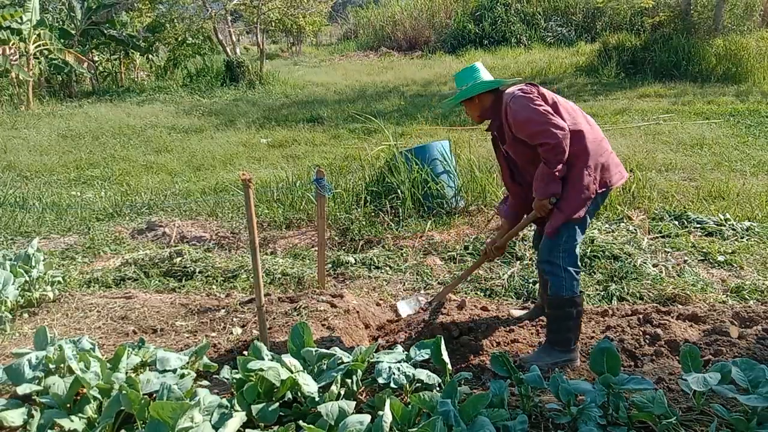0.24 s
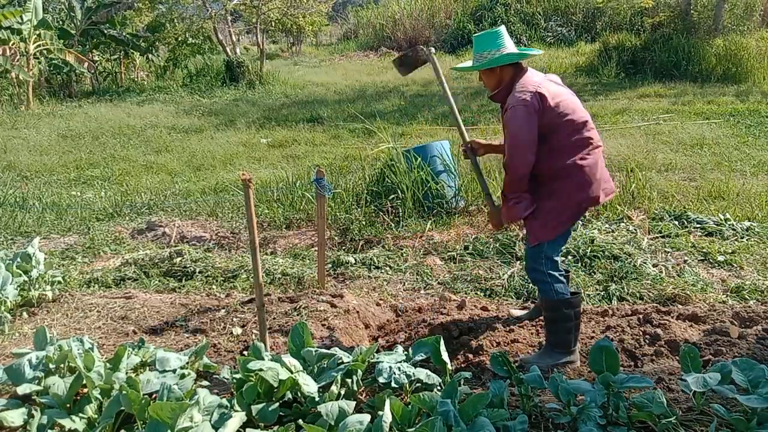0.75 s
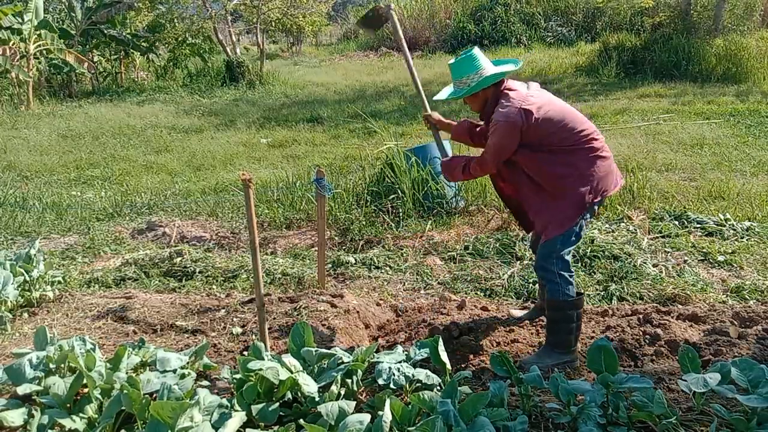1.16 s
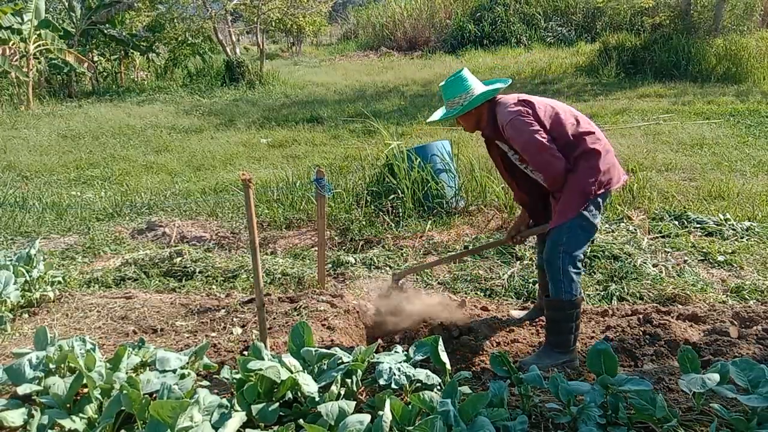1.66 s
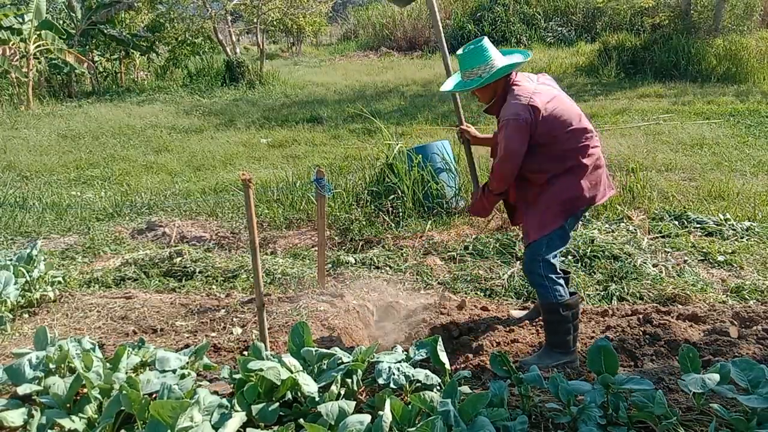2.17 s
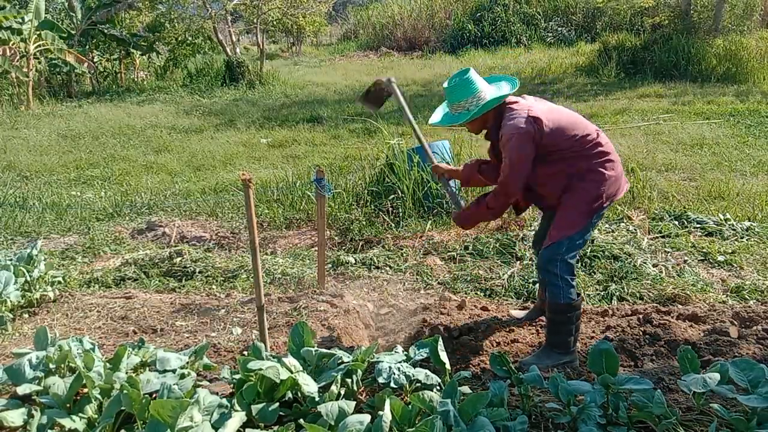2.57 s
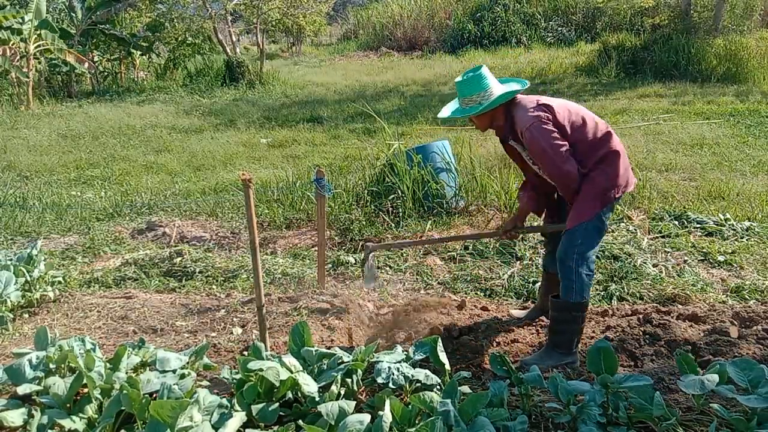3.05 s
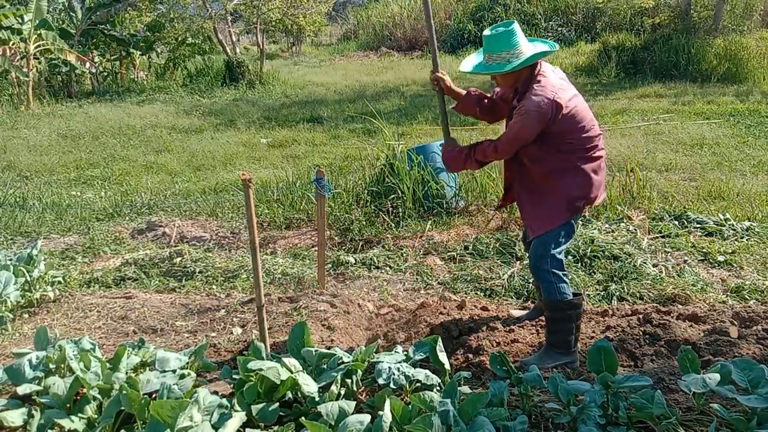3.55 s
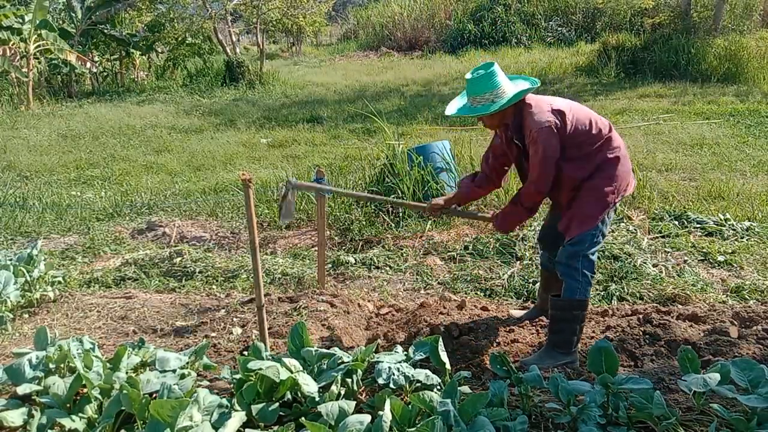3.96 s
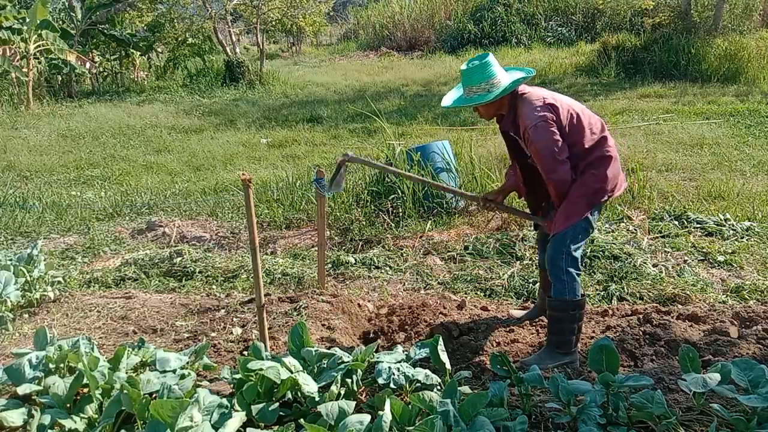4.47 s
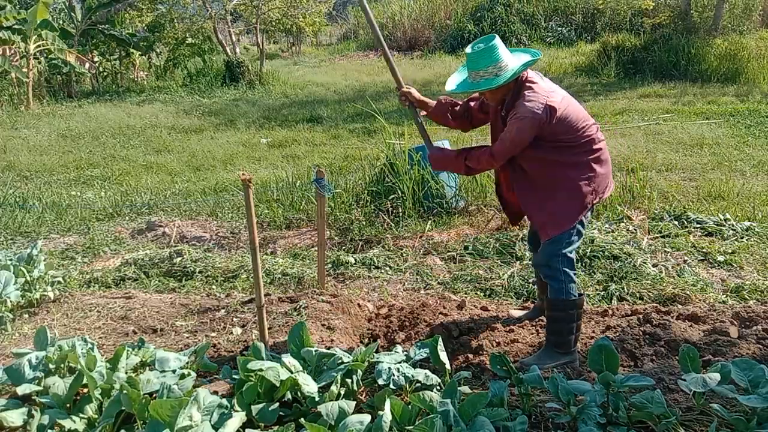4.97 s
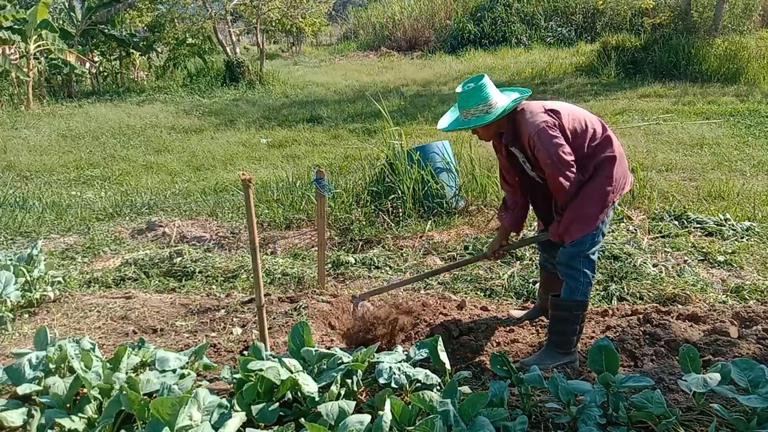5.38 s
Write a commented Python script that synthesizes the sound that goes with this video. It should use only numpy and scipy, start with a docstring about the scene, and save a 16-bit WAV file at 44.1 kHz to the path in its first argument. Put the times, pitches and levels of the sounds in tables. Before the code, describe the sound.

Four gritty hoe thuds in dry earth, one with a steel clink, over low wind rumble and a faint high tone.

```python
"""In a garden, a few metres away, a hoe chops four times into dry soil; the second blow strikes a stone
and the steel blade clinks. Each blow is a quick run of gritty cracks and a dull thud, followed by
falling crumbs and a short outdoor echo. Wind buffets the microphone over a pulsing hiss, a soft
rustle, an airy high tone and a faint, far motor."""
import sys
import numpy as np
from scipy import signal
from scipy.fft import rfft, irfft, next_fast_len
from scipy.io import wavfile
from scipy.ndimage import map_coordinates

SR = 44100
rng = np.random.default_rng(int(sys.argv[2]) if len(sys.argv) > 2 else 0)


def dump(signal):
    """Clip the signal to [-1, 1] and save it as 16-bit WAV at the path in sys.argv[1]."""
    limited = np.clip(np.atleast_2d(signal).T, -1, 1)
    pcm = np.round(limited * 32767).astype(np.int16)
    wavfile.write(sys.argv[1], SR, pcm)


N = 247842
TIME = np.arange(N) / SR

# How strong each sound is from bass to treble: pitch_hz, relative_db
AIR_SPECTRUM = [(30, 10.5), (90, 18), (250, -6.5), (520, -3.5), (850, -0.5), (1700, -2), (3500, -4),
                (5700, -8.5), (7400, -14), (8100, -18.5), (11000, -15.5), (13800, -25.5), (14900, -14),
                (16000, -9.5)]
TONE_SPECTRUM = [(450, -41.5), (620, -16), (850, -16.5), (990, -16), (1130, -7), (1260, 5.5), (1350, -11),
                 (1480, -29.5), (1650, -16.5), (2000, -28.5), (4000, -52.5)]
HISS_SPECTRUM = [(100, -19.5), (600, -32.5), (1000, -25), (1450, 11), (2000, -1), (2600, 3), (3050, -6),
                 (3800, 1.5), (4700, 3), (5700, -2), (6300, -21), (7100, -5.5), (8300, -24.5),
                 (13800, -20.5), (14900, -3.5), (16000, -4.5)]
CHIRR_SPECTRUM = [(3500, -26), (4500, -6), (5400, 3.5), (5900, -5.5), (6400, -18.5), (7300, -4),
                  (8200, -22)]  # the thin, insect-like top of the hiss
WIND_SPECTRUM = [(25, -29.5), (45, -15.5), (70, 3.5), (100, 3.5), (150, -3), (230, -16.5), (330, -22),
                 (500, -33), (900, -76.5)]
ECHO_SPECTRUM = [(100, -4.5), (700, -3), (2500, -8), (6000, -2), (8500, 1.5), (15000, -11)]
SOIL_SPECTRUM = [(100, -14), (400, -17.5), (800, -5), (1300, -4), (2100, 3), (3700, 2.5), (5800, -3),
                 (7500, -4.5), (8200, -13), (9800, -6), (13600, -16.5), (14800, -6), (16000, -20)]

# How each sound slowly grows and fades: time_s, level_db
AIR_LEVEL = [(0, -54), (2, -61), (5.62, -60)]
TONE_LEVEL = [(0, -55), (.4, -52.5), (.8, -67.5), (1.4, -58.5), (2.0, -52.5), (2.7, -52.5), (3.85, -55.5),
              (3.98, -66.5), (4.5, -66.5), (5.62, -67)]
MOTOR_SWELL = [(0, -5.5), (.45, -2), (.8, 1.5), (1.2, -2.5), (1.7, -11), (5.62, -85)]  # added to the level of every motor tone
HISS_LEVEL = [(0, -51.5), (.45, -48), (.82, -58), (1.3, -58.5), (1.7, -72.5), (5.62, -82.5)]
WIND_LEVEL = [(0, -46), (.33, -43), (.66, -54), (1.1, -53.5), (1.2, -42), (1.65, -44), (2.12, -62),
              (2.52, -47), (2.74, -60.5), (2.83, -42), (3.0, -73), (3.22, -38.5), (3.5, -42), (3.82, -41.5),
              (4.04, -71.5), (4.15, -45), (4.45, -56.5), (4.58, -75), (4.72, -51.5), (5.05, -43.5),
              (5.28, -56), (5.55, -47.5)]

# Brief dips in the background: time_s, depth_db, half_length_s
LULLS = [(0.184, 5.5, 0.0091), (0.365, 4, 0.0078), (0.856, 4, 0.018), (1.022, 2, 0.009), (2.068, 9, 0.013),
         (2.401, 12.5, 0.01), (3.625, 4, 0.018), (4.502, 6.5, 0.02), (5.291, 6, .018)]
# The hum of the far motor: pitch_hz, level_db
MOTOR_TONES = [(366, -70), (402, -67.5), (437, -74)]
# The sinking rustle: time_s, centre_hz, level_db
RUSTLE_PATH = [(0, 3200, -104), (1.85, 2500, -67), (2.7, 2110, -66.5), (3.3, 2001, -75),
               (5.62, 1960, -75.5)]
# Strong eddies (whirls of air) thump the microphone: time_s, level_db, pitch_hz
BUFFETS = [(0.169, -24.5, 166), (0.34, -33, 131), (.562, -31.5, 99), (.853, -33, 109), (0.946, -36, 120),
           (1.161, -21.5, 148), (1.223, -26.5, 159), (1.358, -26.5, 133), (1.394, -27.5, 131),
           (1.46, -29, 147), (1.631, -27, 180), (1.738, -22.5, 150), (2.034, -27.5, 132),
           (2.209, -35.5, 107), (2.312, -33, 114), (2.629, -30, 96), (3.211, -21, 135), (3.32, -21, 285),
           (3.356, -21, 113), (3.376, -24.5, 266), (3.428, -20.5, 190), (3.46, -18, 156),
           (3.477, -16.5, 179), (3.509, -20.5, 160), (3.66, -21, 127.8), (4.198, -31.5, 141.4),
           (4.43, -30, 113), (4.808, -33.5, 119), (5.014, -32.5, 121), (5.541, -33.5, 116)]
# Stray lumps of soil roll down: start_s, level_db, length_s, tilt_db_per_octave
LUMPS = [(1.409, -55.5, .023, -4), (1.571, -49, 0.023, -11), (1.732, -57.5, 0.024, -7),
         (1.782, -54.5, 0.084, -10), (1.908, -57, 0.042, -2.5), (2.099, -60, 0.16, -7.5),
         (2.631, -55, 0.061, -9.5), (2.757, -52, 0.0077, -8), (3.672, -53.5, 0.067, -12.5)]
# After each blow crumbs settle, trickle on, and slide as the blade is pulled out:
# delay_s, level_db, length_s, tilt_db_per_octave
CRUMB_FALLS = [(0.039, -55, .038, -8), (.085, -61.5, .11, -2.5), (0.278, -59, 0.068, -7)]
# The tones of the steel blade: pitch_hz, relative_db, ring_s (time to fade by 60 dB)
BLADE_TONES = [(1029, -12, .016), (1253, -7, .029), (1868, -13, .04), (2630, -9, .033), (3260, -11, .014),
               (3520, -10, .03), (3815, -1, .026), (4810, -8, .022), (4990, -10, .02), (5753, -12, .032),
               (5980, -16, .04), (6540, -13, .032), (10320, -17, .02), (11360, -23, .019),
               (14630, -21, .06)]
# A clod gives way in three cracks:
# share_of_sink_time, relative_db, length_s, tilt_db_per_octave, pitch_ratio
CLOD_CRACKS = [(0.632, 1, 0.0013, -1, 0.9), (0.864, -5, .006, -1, .75), (0.978, -0.5, .003, -2.5, 1.15)]
# Blows of the hoe: start_s, graze_db, bite_db, bite_length_s, tilt_db_per_octave, bite_hz, ring_db,
# sink_time_s, clod_db, clod_hz, thud_db, thud_hz, spill_db
BLOWS = [(1.483, -36.5, -27, 0.0052, -2.5, 1320, -60, .012, -34.5, 1370, -35.5, 304, -49.5),
         (2.8077, -70, -17, .004, 2, 3700, -5, .021, -34, 1610, -33, 404, -37),
         (4.1156, -34, -20, .0016, 7.5, 5460, -37.5, .024, -26.5, 3100, -33.5, 270, -50.5),
         (5.352, -64, -20, 0.0025, 8, 5700, -33, .0225, -24.5, 3000, -37.5, 400, -42.5)]


def gain(db):
    """Turn decibels into a number to multiply by."""
    return 10 ** (np.asarray(db) / 20)


def unit(x):
    """Scale a signal to an average power of 1."""
    return x / np.sqrt(np.mean(x ** 2))


def curve(rows):
    """Join a table's points with straight lines in time, one curve for each value column."""
    times, *columns = np.transpose(rows)
    return [np.interp(TIME, times, column) for column in columns]


def colour(x, spectrum, tilt_db=0):
    """Filter a sound to a spectrum; a tilt above 0 (dB per octave) brightens it, below 0 dulls it."""
    size = next_fast_len(len(x) + 2048, real=True) * 2
    octave = np.log2(np.maximum(np.arange(size // 2 + 1) * SR / size, 1))
    hz, db = np.transpose(spectrum)
    slope_db = tilt_db * np.clip(octave, np.log2(900), np.log2(9000))
    shape = unit(gain(np.interp(octave, np.log2(hz), db) + slope_db))
    # these steps make the filter ring only after a click, never before it
    cepstrum = irfft(np.log(shape))
    cepstrum[1:size // 2] *= 2
    cepstrum[size // 2 + 1:] = 0
    return irfft(rfft(x, size) * np.exp(rfft(cepstrum)))[:len(x)]


def noise(spectrum):
    """Steady noise with the given spectrum."""
    return unit(colour(rng.standard_normal(N), spectrum))


def wander(rate_hz):
    """A random drift around 0, about 1 in size."""
    steps = rng.standard_normal(N)
    return np.sqrt(3 / 2) * np.interp(TIME * rate_hz, np.arange(N), steps)


def flutter(depth_db, rate_hz):
    """A gain that wavers at random."""
    return unit(gain(depth_db * wander(rate_hz)))


def swirl(x, spread_db, patch_hz=260, patch_s=.11):
    """Make small patches of neighbouring pitches swell and fade, each in its own time."""
    hz, s, spectrum = signal.stft(x, SR, nperseg=512)
    patches = np.meshgrid(hz / patch_hz, s / patch_s, indexing="ij")
    swells = map_coordinates(rng.standard_normal((256, 512)), patches, order=3, mode="nearest")
    return signal.istft(spectrum * unit(gain(spread_db * swells)), SR)[1][:N]


def add(track, start_s, sound):
    """Mix a sound into a track."""
    start = int(start_s * SR)
    track[start:start + len(sound)] += sound[:N - start]


def burst(t, length_s, rise_s):
    """A loudness shape that rises fast, holds briefly and dies."""
    return (1 - np.exp(-t / rise_s)) * np.exp(-(t / (1.19 * length_s)) ** 2)


def lulls():
    """A gain that dips briefly at each lull."""
    return gain(-sum(db * np.exp(-.5 * ((TIME - s) / half_s) ** 2) for s, db, half_s in LULLS))


def still_air():
    """The soft, even hush of the outdoors."""
    level_db, = curve(AIR_LEVEL)
    return swirl(noise(AIR_SPECTRUM), spread_db=2.8, patch_hz=280, patch_s=.035) * gain(level_db)


def airy_tone():
    """Noise gathered around one high pitch makes a breathy, wavering tone."""
    level_db, = curve(TONE_LEVEL)
    tone = swirl(noise(TONE_SPECTRUM), spread_db=4.2, patch_hz=120, patch_s=.035)
    return tone * flutter(depth_db=2, rate_hz=14) * gain(level_db)


def motor(drift=.008, waver_db=3, waver_hz=14):
    """A far engine hums with a few wavering tones, then fades away."""
    swell_db, = curve(MOTOR_SWELL)
    clock = np.cumsum(1 + drift * wander(waver_hz)) / SR
    hum = np.zeros(N)
    for hz, db in MOTOR_TONES:
        level = gain(db + swell_db + waver_db * wander(waver_hz))
        hum += np.sqrt(2) * level * np.sin(2 * np.pi * hz * clock)
    return hum


def rustle(width_octaves=.24):
    """A soft, patchy band of noise sinks in pitch."""
    hz, s, spectrum = signal.stft(rng.standard_normal(N), SR, nperseg=512)
    centre_hz, level_db = curve(RUSTLE_PATH)
    off_centre = np.log2((hz[:, None] + 1) / np.interp(s, TIME, centre_hz)) / width_octaves
    band = signal.istft(spectrum * np.exp(-.5 * off_centre ** 2), SR)[1][:N]
    return unit(swirl(band, spread_db=4.5, patch_hz=200, patch_s=.04)) * gain(level_db)


def pulsing_hiss(first_s=.029, period_s=.168, gap_db=-18, chirr_end_db=-69):
    """A raspy hiss pulses about six times a second; it fades until only a thin chirr is left."""
    level_db, = curve(HISS_LEVEL)
    cycle = ((TIME - first_s) / period_s) % 1
    hiss_pulse = gain(gap_db) + np.interp(cycle, [0, .02, .3, .6, .78, .9], [0, .55, 1, 1, .4, 0])
    chirr_pulse = np.cos(np.pi * (cycle - .31)) ** 4
    rasp = flutter(depth_db=1.6, rate_hz=500)
    hiss = swirl(noise(HISS_SPECTRUM), spread_db=2.6, patch_hz=220, patch_s=.025) * gain(level_db)
    chirr = swirl(noise(CHIRR_SPECTRUM), spread_db=3)
    # the chirr falls only about a quarter as many dB as the hiss
    chirr_db = chirr_end_db + .24 * (level_db - level_db[-1]) + 1.2 * wander(rate_hz=8.9)
    return rasp * (hiss_pulse * hiss + chirr_pulse * chirr * gain(chirr_db))


def small_eddies(wind_db, count=40, above_wind_db=4, pitch_hz=120):
    """Weak eddies come at random and follow the wind's strength: rows of time_s, level_db, pitch_hz."""
    moments = rng.integers(0, N, count)
    size, speed = rng.standard_normal((count, 2)).T
    levels_db = wind_db[moments] + above_wind_db + 1.5 * size
    return list(zip(TIME[moments], levels_db, pitch_hz * 2 ** (.17 * speed)))


def wind(rumble_db=1.5, wake_db=-14.5, wake_delay_s=.0044, wake_s=.013, edge_db=-13.5):
    """Churning air rumbles on the microphone; each eddy is one quick swing of air pressure."""
    level_db, = curve(WIND_LEVEL)
    gusts = gain(level_db + rumble_db) * flutter(depth_db=3, rate_hz=14) * lulls()
    # each strong eddy trails a short wake with less bass than the rumble
    puffs = sum(gain(db + wake_db) * np.exp(-.5 * ((TIME - s - wake_delay_s) / wake_s) ** 2)
                for s, db, _ in BUFFETS)
    wake = unit(signal.sosfilt(signal.butter(3, 99, "high", fs=SR, output="sos"), noise(WIND_SPECTRUM)))
    out = (noise(WIND_SPECTRUM) * gusts + wake * puffs) * flutter(depth_db=2, rate_hz=45)
    t = TIME[:SR // 32] - 1 / 64
    for s, db, hz in BUFFETS + small_eddies(level_db):
        # a weaker, faster swing gives the thump a steeper edge
        for part_db, part_hz in ((db, hz), (db + edge_db, hz * 1.75)):
            one_cycle = np.exp(-.5 * (t * part_hz / .35) ** 2)
            swing = np.sin(2 * np.pi * (part_hz * t + rng.random())) * one_cycle
            add(out, max(s + t[0], 0), gain(part_db) * swing)
    return signal.sosfilt(signal.butter(3, 52, "high", fs=SR, output="sos"), out)


def garden_echo(x, near_db=-17, near_fade_s=.14, far_db=-21, far_fade_s=.3):
    """Ground and plants add a short, bright echo; the hedges return a longer, duller one."""
    t = TIME[:SR // 2]
    near, far = rng.standard_normal((2, len(t))) * (1 - np.exp(-t / .0051))
    near = colour(near * gain(-60 * t / near_fade_s), ECHO_SPECTRUM)
    far = colour(far * gain(-60 * t / far_fade_s), ECHO_SPECTRUM)
    far = signal.sosfilt(signal.butter(3, 6500, fs=SR, output="sos"), far)
    echo = (gain(near_db) * unit(near) + gain(far_db) * unit(far)) / np.sqrt(len(t))
    return x + signal.fftconvolve(x, echo)[:N]


def grit(length_s, tilt_db, spread_db, rise_s):
    """Soil grains snap in a dense burst of clicks of uneven size."""
    t = TIME[:SR // 3]
    clicks = rng.standard_normal(len(t)) * gain(spread_db * np.minimum(rng.exponential(size=len(t)), 5))
    envelope = burst(t, length_s, rise_s)
    return unit(colour(clicks * envelope, SOIL_SPECTRUM, tilt_db)) * np.sqrt(np.mean(envelope ** 2))


def crumbs(spill_s=.029):
    """Loose soil rains down after each blow; lumps of different sizes keep changing its tone."""
    out, falls = np.zeros(N), list(LUMPS)
    for s, *_, sink_s, _, _, _, _, spill_db in BLOWS:
        falls.append((s + sink_s, spill_db, spill_s, 0))  # soil spills off the blade as it stops
        falls += [(s + delay_s, *fall) for delay_s, *fall in CRUMB_FALLS]
    for s, db, length_s, tilt_db in falls:
        if s < TIME[-1]:
            add(out, s, gain(db) * grit(length_s, tilt_db, spread_db=6.5, rise_s=.0029))
    return swirl(out, spread_db=4, patch_hz=370, patch_s=.013)


def thud(hz, length_s=.014):
    """The earth takes the weight of the blow with a short, low burst."""
    t = TIME[:SR // 6]
    low_band = signal.butter(2, [hz / 2, hz * 1.39], "band", fs=SR, output="sos")
    earth = signal.sosfilt(low_band, rng.standard_normal(len(t)))
    envelope = burst(t, length_s, rise_s=.00085)
    return unit(earth * envelope) * np.sqrt(np.mean(envelope ** 2))


def crack(length_s, tilt_db, hz, body_db=5):
    """Dry soil breaks: a burst of grit that rings a little around one pitch."""
    snaps = grit(length_s, tilt_db, spread_db=1.5, rise_s=.0002)
    body = signal.lfilter(*signal.iirpeak(hz, Q=7, fs=SR), snaps)
    return unit(snaps + gain(body_db) * body) * snaps.std()


def clink(rise_s=.00091, free_s=.0081, choked_gain=.35):
    """The steel blade rings freely for a moment, then the earth closes around it and chokes it."""
    t = TIME[:SR // 6]
    ring = sum(gain(db - 60 * t / ring_s) * np.sin(2 * np.pi * (hz * t + rng.random()))
               for hz, db, ring_s in BLADE_TONES)
    grip = choked_gain + (1 - choked_gain) * np.exp(-(t / free_s) ** 4)
    return ring * grip * (1 - np.exp(-t / rise_s))


def hoe(graze_lead_s=.003, slice_delay_s=.0025, thud_delay_s=.009):
    """Each blow cracks the soil, rings the blade and thuds into the ground."""
    out = np.zeros(N)
    for (s, graze_db, bite_db, bite_s, tilt_db, bite_hz, ring_db,
         sink_s, clod_db, clod_hz, thud_db, thud_hz, _) in BLOWS:
        dull_tilt_db = tilt_db - 7.5
        # the edge grazes loose soil, then bites
        add(out, s - graze_lead_s, gain(graze_db) * crack(.006, dull_tilt_db, bite_hz))
        add(out, s, gain(bite_db) * crack(bite_s, tilt_db, bite_hz))
        add(out, s, gain(ring_db) * clink())
        # it slices on, softer and duller
        add(out, s + slice_delay_s, gain(bite_db - 11) * crack(.0086, dull_tilt_db, hz=1926))
        add(out, s + slice_delay_s, gain(ring_db - 12) * clink())
        # the clod gives way as the blade sinks in
        for share, db, length_s, clod_tilt_db, ratio in CLOD_CRACKS:
            break_s = s + share * sink_s
            add(out, break_s, gain(clod_db + db) * crack(length_s, clod_tilt_db, clod_hz * ratio))
            add(out, break_s, gain(clod_db + db - 4) * clink())
        add(out, s + thud_delay_s, gain(thud_db) * thud(thud_hz))
    return out


def scene():
    """The hoe and falling soil in the garden, with wind and background, in one channel."""
    digging = garden_echo(hoe() + crumbs())
    rumble = wind()
    background = (airy_tone() + still_air() + pulsing_hiss() + rustle()) * lulls()
    return (digging + rumble + background + motor())[None]


def record(dry, top_hz=15450):
    """The recorder cuts off the highest treble."""
    return signal.sosfilt(signal.ellip(8, .2, 70, top_hz, fs=SR, output="sos"), dry)


dry = scene()
out = record(dry)
dump(out)
```